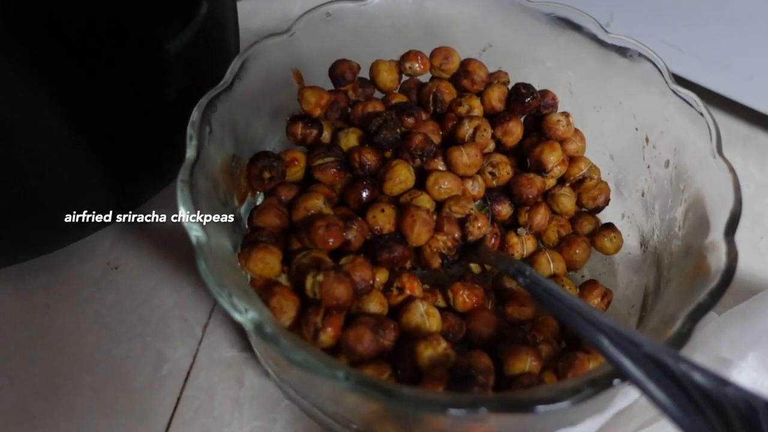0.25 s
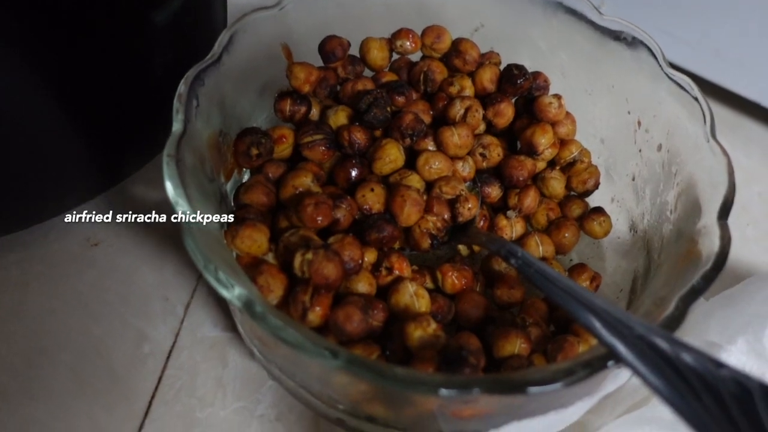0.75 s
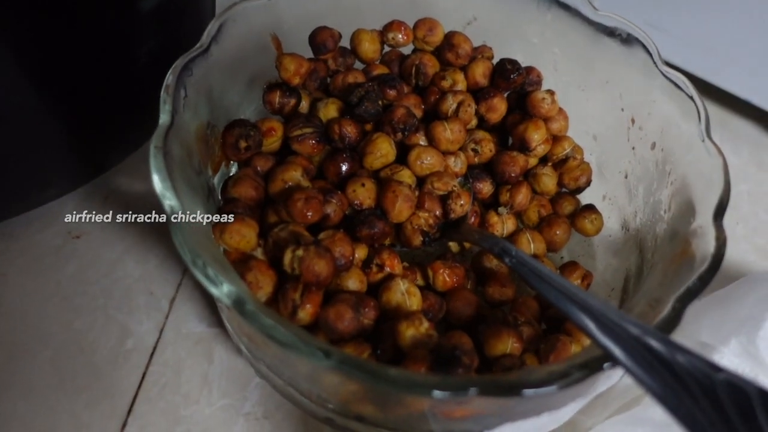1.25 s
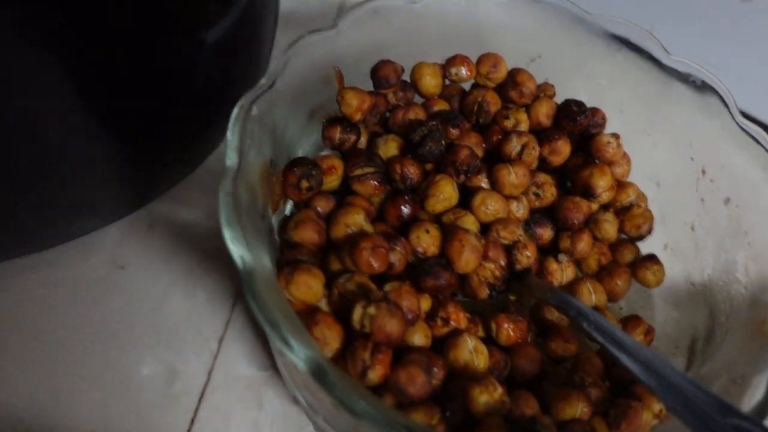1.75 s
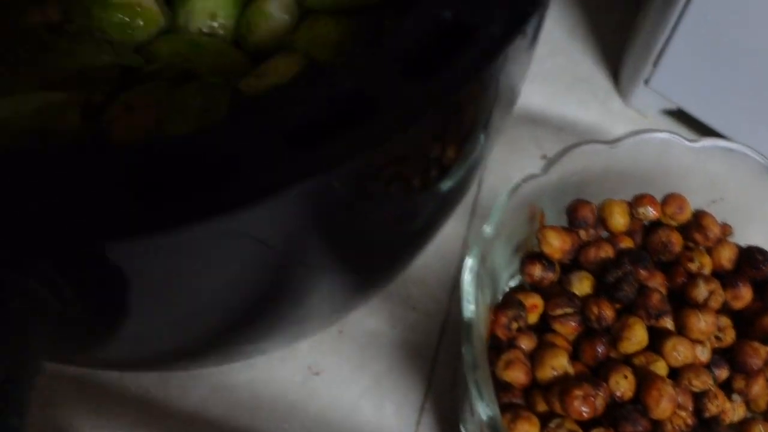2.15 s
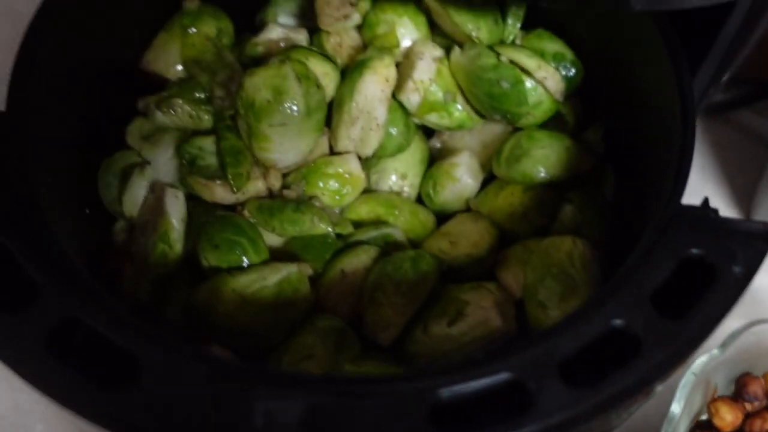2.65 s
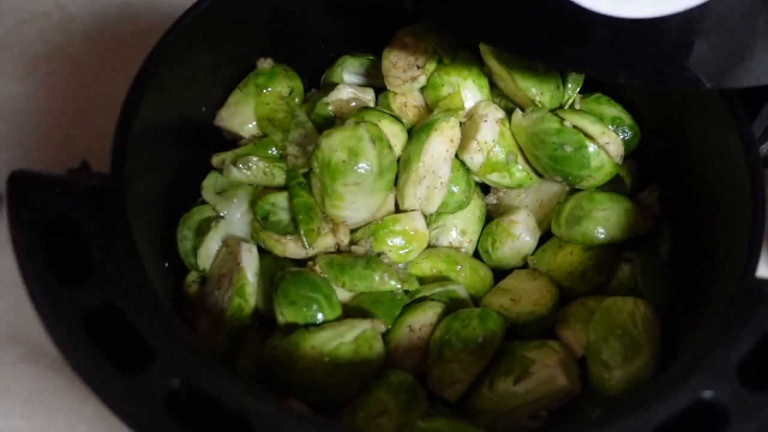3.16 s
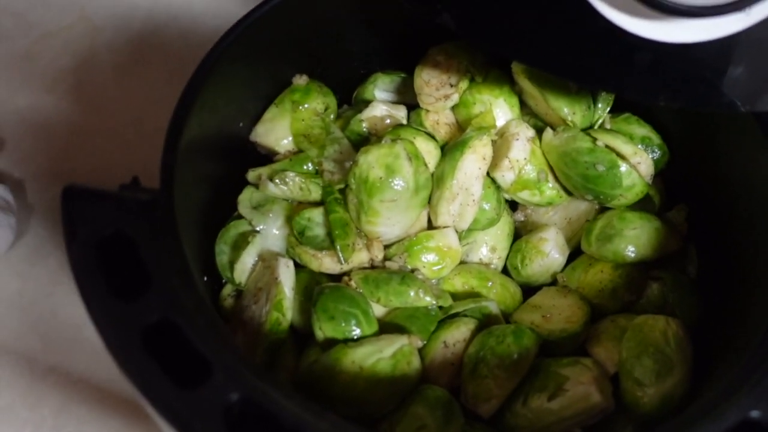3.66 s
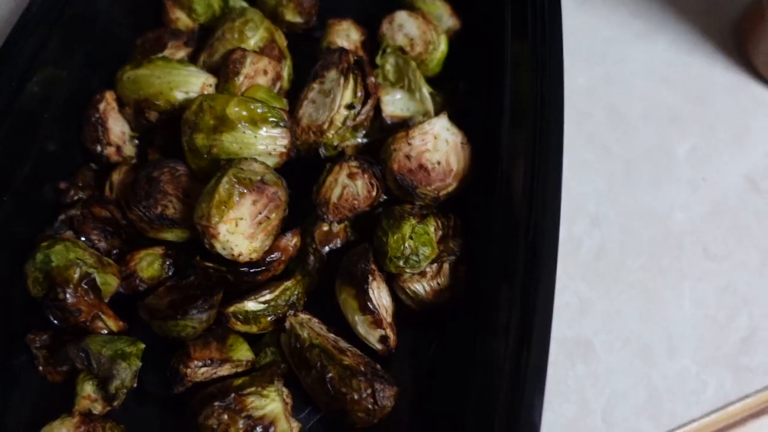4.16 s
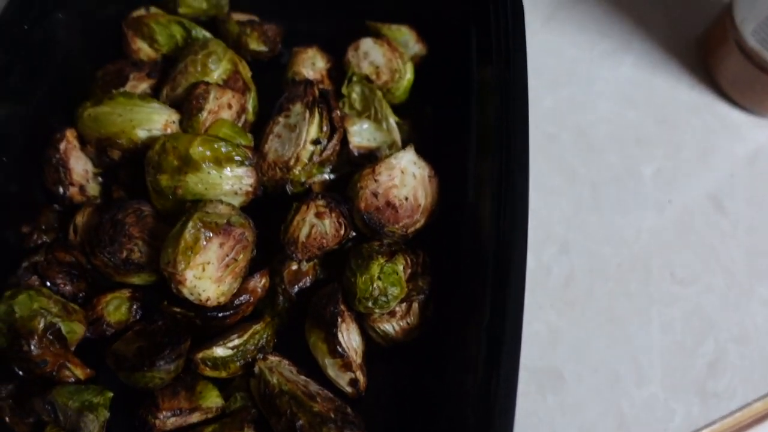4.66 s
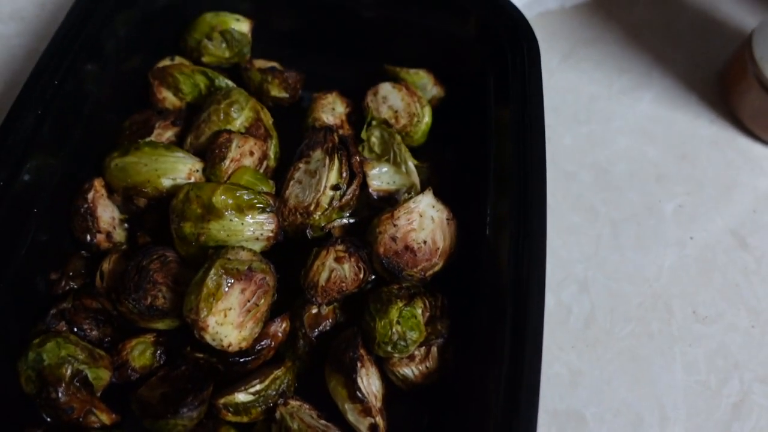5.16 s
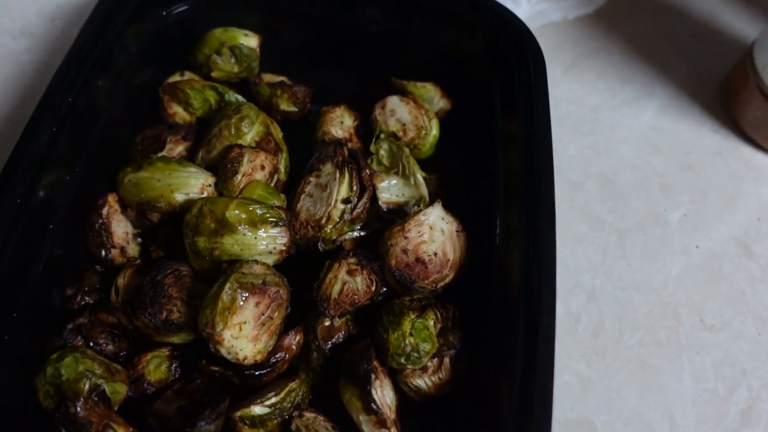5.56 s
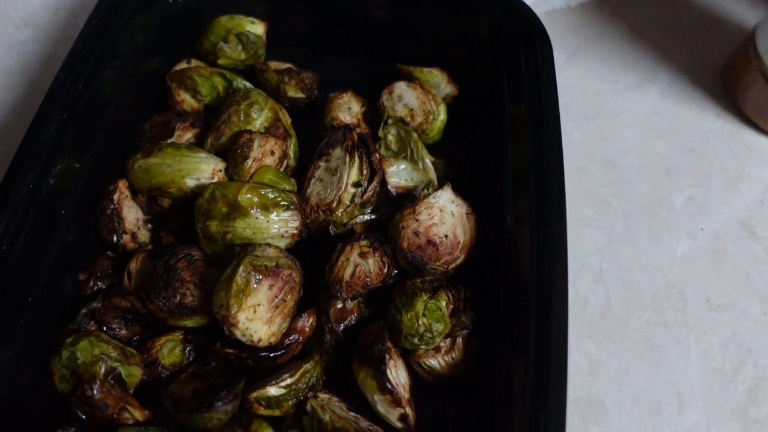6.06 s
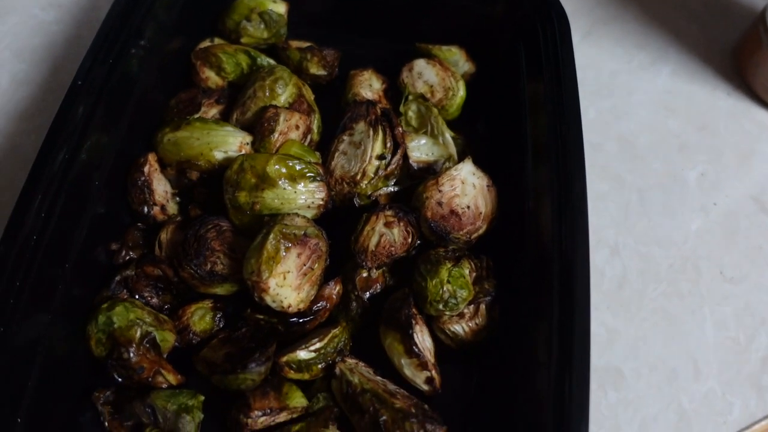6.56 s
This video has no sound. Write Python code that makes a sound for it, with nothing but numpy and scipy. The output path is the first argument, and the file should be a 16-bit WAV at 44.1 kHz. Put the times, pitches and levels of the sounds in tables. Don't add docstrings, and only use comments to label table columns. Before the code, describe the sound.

A clockwork kitchen timer ticks evenly over thin sizzle and faint hum, then a plastic tray knocks twice, rattles and creaks in quieter room air.

```python
import sys
import numpy as np
from scipy import signal
from scipy.fft import rfft, irfft, next_fast_len
from scipy.io import wavfile
from scipy.ndimage import uniform_filter1d

SR = 44100
rng = np.random.default_rng(int(sys.argv[2]) if len(sys.argv) > 2 else 0)


def bounce(signal):
    frames = np.transpose(np.atleast_2d(signal))
    limited = np.clip(frames, -1, 1)
    pcm = np.round(limited * 32767).astype(np.int16)
    wavfile.write(sys.argv[1], SR, pcm)


def makeup_ratio(level_db):
    decades = np.asarray(level_db, float) / 20
    return 10 ** decades


N = 300753
SIDES = np.array([[1], [-1]])
TOP_HZ = 15850


def in_time(rows):
    s, *columns = np.transpose(rows)
    return [np.interp(np.arange(N) / SR, s, c) for c in columns]


def at_hz(points, hz):
    point_hz, value = np.transpose(points)
    return np.interp(np.log(hz), np.log(point_hz), value)


def drift(rate_hz):
    r = np.exp(-2 * np.pi * rate_hz * 40 / SR)
    slow = signal.lfilter([1], [1, -2 * r, r * r], rng.standard_normal(N // 40 + 2002))[2000:]
    return np.interp(np.arange(N) / 40, np.arange(len(slow)), slow / slow.std())


def band(x, low_hz, high_hz):
    return signal.sosfilt(signal.butter(3, [low_hz, high_hz], "band", fs=SR, output="sos"), x)


# (frequency [Hz], likeness [0-1])
LIKENESS = [(60, 0.59), (110, 0.62), (200, 0.89), (380, 0.83), (700, 0.43), (1290, 0.67), (2380, 0.75),
            (4400, 0.71), (8120, 0.83), (15000, 0.9)]


def coloured(spectrum, peaks, pan):
    size = next_fast_len(N)
    hz = np.maximum(np.arange(size // 2 + 1) * SR / size, 1)
    gain = makeup_ratio(at_hz(spectrum, hz)) * (hz < TOP_HZ)
    for centre_hz, width_hz, lift_db in peaks:
        resonance = 1 / (1 + (2 * (hz - centre_hz) / width_hz) ** 2)
        gain = gain * (1 + (makeup_ratio(lift_db) - 1) * resonance)
    alike = np.clip(at_hz(LIKENESS, hz), 0, 1)
    mid, side = rfft(rng.standard_normal((2, size)))
    pair = np.sqrt(1 + alike) * mid + SIDES * np.sqrt(1 - alike) * side
    pair = pair * makeup_ratio(SIDES * at_hz(pan, hz) / 2)
    out = irfft(gain * pair, size)[:, :N]
    return out / out.mean(axis=0).std()


def streaky(x, depth_db, width_hz, hold_s):
    hz, t, cells = signal.stft(x, SR, nperseg=1024)
    field = rng.standard_normal(cells.shape[1:])
    for _ in range(2):
        field = uniform_filter1d(field, max(1, round(width_hz / hz[1])), axis=0)
        field = uniform_filter1d(field, max(1, round(hold_s / t[1])), axis=1)
    gain = makeup_ratio(depth_db * field / field.std())
    gain = gain / np.sqrt(np.mean(gain ** 2))
    return signal.istft(cells * gain, SR, nperseg=1024)[1][:, :N]


def strike(hits, modes, click, chatter_s, spread_db, pivot_hz, tilt, rise_cycles, softening, low_hz, high_hz,
           detune):
    out, size = np.zeros((2, N)), 4096
    t = np.arange(size) / SR
    hz, mode_db, t60, side_db, lead = np.transpose(modes)[:, :, None]
    swell = makeup_ratio(-60 * t / t60) * (1 - np.exp(-(t + 1 / SR) * hz / rise_cycles))
    for s, level_db, bright_db, pan_db in hits:
        turns = 2 * np.pi * hz * t * (1 + detune * rng.standard_normal(hz.shape))
        rings = np.array([makeup_ratio(k * side_db / 2) * swell * np.sin(turns + k * lead / 2) for k in (1, -1)])
        grains = rng.standard_normal(size // 4) * rng.random(size // 4) ** 3
        chatter = grains * np.exp(-t[:size // 4] / chatter_s)
        chatter[0] = click
        db = mode_db + tilt * bright_db * np.log2(hz / pivot_hz)
        db = db + spread_db * rng.standard_normal(hz.shape)
        force = rfft(chatter, 2 * size)
        force = force / np.sqrt(uniform_filter1d(np.abs(force) ** 2, size=60))
        sound = irfft(rfft(makeup_ratio(db[:, 0]) @ rings, 2 * size) * force)[:, :size]
        top_hz = np.clip(high_hz * makeup_ratio(softening * bright_db), 3 * low_hz, .45 * SR)
        sound = signal.sosfilt(signal.butter(2, [low_hz, top_hz], "band", fs=SR, output="sos"), sound)
        sound = signal.sosfilt(signal.butter(2, 0.7 * low_hz, "high", fs=SR, output="sos"), sound)
        first = sound[:, :size // 24].mean(axis=0)
        i = round(s * SR)
        out[:, i:i + size] += (makeup_ratio(level_db + SIDES * pan_db / 2) * sound / first.std())[:, :N - i]
    return out


def bursts(rows, octaves, alike):
    out, t = np.zeros((2, N + 16384)), np.arange(16384) / SR
    for s, db, decay_s, hz, pan_db in rows:
        mid, side = rng.standard_normal((2, len(t))) * np.exp(-t / decay_s)
        burst = np.sqrt(1 + alike) * mid + SIDES * np.sqrt(1 - alike) * side
        low_hz = hz * 2 ** (-octaves / 2)
        high_hz = min(hz * 2 ** (octaves / 2), TOP_HZ)
        sound = band(burst + 1e-18, low_hz, high_hz)
        usual = (1 + alike) * decay_s * (high_hz - low_hz)
        sound = sound * np.sqrt(usual / np.sum(sound.mean(axis=0) ** 2))
        out[:, round(s * SR):][:, :len(t)] += makeup_ratio(db + SIDES * pan_db / 2) * sound
    return out[:, :N]


# (frequency [Hz], density [dB per Hz])
NEAR_COLOUR = [(24, -78), (40, -52), (95, -34.5), (180, -11), (290, -9.5), (400, -9), (663, -8.5),
               (1070, -4.5), (2050, -7.5), (2630, -7.5), (3300, -12), (7000, -15.5), (12000, -23.5),
               (16000, -26.5)]
# (frequency [Hz], width [Hz], lift [dB])
NEAR_PEAKS = [(512, 125, 6), (1100, 210, 7.5), (1496, 350, 6.5), (2583, 85, 12.5), (5300, 240, 4)]
# (frequency [Hz], left-right [dB])
NEAR_PAN = [(60, -0.5), (150, 2.5), (380, -4.5), (950, 1.5), (2380, 0.39), (5980, 1), (15000, 5)]


def near_air():
    t = np.arange(N) / SR
    level_db = -58.92 - 0.33 * t + 0.15 * drift(8.4)
    air = coloured(NEAR_COLOUR, NEAR_PEAKS, NEAR_PAN)
    return makeup_ratio(level_db) * streaky(air, depth_db=1.15, width_hz=90, hold_s=.1)


# (frequency [Hz], density [dB per Hz])
SIZZLE_COLOUR = [(5000, -35), (7000, -23), (8600, -5.5), (9750, 7), (10500, 2.5), (11400, -25),
                 (12500, -41)]
# (frequency [Hz], density [dB per Hz])
SIZZLE_EDGE = [(7600, -18), (8500, 1), (9600, -10), (10800, 2), (11900, -1), (12500, -28), (14000, -38.5)]
# (frequency [Hz], width [Hz], lift [dB])
SIZZLE_PEAKS = [(8800, 130, 2.5), (9700, 160, 0), (9700, 150, 3), (10850, 130, 3.5), (11600, 200, 4)]


def sizzle():
    t = np.arange(N) / SR
    period_s, top_s, dip_sharpness = 1.05, 0.4, 4.1
    cycle = np.cos(2 * np.pi * (t - top_s) / period_s)
    swell = -np.exp(dip_sharpness * (cycle - 1)) + 0.071 * drift(1.8)
    core = streaky(coloured(SIZZLE_COLOUR, SIZZLE_PEAKS, NEAR_PAN), depth_db=1.3, width_hz=200, hold_s=0.3)
    edge = streaky(coloured(SIZZLE_EDGE, SIZZLE_PEAKS, NEAR_PAN), depth_db=-4.0, width_hz=100, hold_s=0.86)
    return makeup_ratio(-63.5 + 5 * swell) * core + makeup_ratio(-74 + 4.5 * swell + t) * edge


# (time [s], level [dB])
HUM = [
    [(0.0, -78), (1.76, -76), (2.86, -85), (3.0, -76.5), (4.04, -82), (4.14, -101)],
    [(4.5, -64), (4.74, -59), (5.2, -62.5), (5.62, -64), (6.04, -63), (6.78, -65.5), (6.82, -73)],
]


def hum(rows, pan_db, waver_db):
    phase = 2 * np.pi * np.cumsum(348.2 + 1.25 * drift(5.85)) / SR
    level_db = in_time(rows)[0] + waver_db * drift(7.1) + SIDES * pan_db / 2
    return np.sqrt(2) * makeup_ratio(level_db) * (np.sin(phase) + makeup_ratio(-24) * np.sin(phase / 2))


# (time [s], level [dB], decay [s], centre [Hz], left-right [dB])
BUMPS = [
    (.12, -47, 0.081, 506, -4),
    (.33, -53.5, 0.88, 627, -15),
    (.6, -53, 0.17, 635, -18),
    (.7565, -43, 0.012, 6860, -1),
    (1.949, -43, 0.081, 492, -6),
    (2.66, -40.5, 0.016, 514, -14),
    (2.99, -31, 0.0059, 410, -5.5),
    (3.725, -36, 0.013, 636, -11),
]


def bumps():
    return bursts(BUMPS, octaves=0.24, alike=1.0)


# (frequency [Hz], level [dB], t60 [s], extra on tocks [dB],
# extra once the microphone faces the timer [dB])
TIMER_MODES = [(1154, -12, 0.19, -5.5, -2.5), (1640, -7.5, 0.0087, 7, -14), (2250, -14.5, 0.0063, 18.5, -4),
               (2652, -1, 0.029, 0.5, 2), (2816, -1, 0.023, 0.5, -0.5), (3540, -11, 0.024, 1, 3),
               (4240, -11, 0.056, 8, -3.5), (4563, -1.5, 0.017, -0.5, 2.5), (4866, -5.5, 0.015, 1.5, 7.5),
               (5210, -8, 0.026, -1, 9.5), (6250, -1.5, 0.009, 3, -3.5), (6580, -7, 0.02, 1, -1.5),
               (7260, -0.5, 0.0041, 3, -3.5), (7990, 4.5, 0.0047, -2, 2), (8580, -1, 0.0031, 4.5, 4.5),
               (9700, -4.5, 0.0048, -12, 6), (9230, 9.5, 0.0038, -3, -9), (10300, -14, 0.004, -11, 7),
               (10900, -27, 0.0068, -2, 14)]
# (time [s], level [dB], brightness [dB], level of the unlocking before it [dB])
BEATS = [(0.259, -40.5, 4, -70), (0.537, -39.5, -4, -65), (0.8156, -38.5, 8, -51), (1.0972, -42, -2, -54),
         (1.3773, -43, 0, -52), (1.6607, -41.5, -4, -56), (1.941, -39.5, 3, -49.5),
         (2.2246, -39.5, 17, -52), (2.5057, -39, 8, -48), (2.79, -39.5, 10, -50),
         (3.0709, -37.5, 16, -47.5), (3.3587, -40.5, 1.5, -49.5), (3.6386, -41.5, 0, -49),
         (3.9259, -40.5, -1, -51.5)]
# (lead [s], brightness [dB])
UNLOCK = [
    (0.0335, -0.5),
    (0.0138, -3),
]
# (delay [s], loss [dB])
BOUNCES = [(.0031, -6.5), (.0045, -8.5), (0.0022, -5), (0.0051, -6), (.003, -4), (.003, -14), (0.0036, -3),
           (0.0042, -9.5), (0.0043, -6.5), (0.0042, -3.5), (0.006, -7), (0.0059, -12), (0.0046, -9),
           (0.0024, -4)]
# (time [s], level [dB], brightness [dB])
PLAY = [(0.2435, -50.5, 0), (0.896, -57, 23), (2.1972, -59, 13), (2.312, -58.5, 5), (2.53, -55, 8),
        (2.759, -60, 9), (3.1596, -59, -21), (3.327, -58, 4), (3.6638, -53, -21), (3.7278, -58, -27),
        (2.593, -58.5, 3), (.158, -59, -6), (.337, -61, 12), (.715, -65, 8), (1.265, -61, 14),
        (1.775, -63, 10), (1.839, -65, 5), (1.97, -58, 12), (2.2018, -62, 12)]
# (time [s], left-right [dB])
TURN = [(1.9, 3), (2.3, 1.8)]


def timer():
    facing_s = 2.1
    hits = []
    for k, ((s, db, bright, unlock_db), (lag_s, loss_db)) in enumerate(zip(BEATS, BOUNCES)):
        tock = k % 2
        lead_s, unlock_bright = UNLOCK[tock]
        hits.append((s - lead_s, unlock_db, unlock_bright, tock))
        hits.append((s, db, bright, tock))
        hits.append((s + lag_s, db + loss_db, bright, tock))
        if tock:
            hits.append((s + 0.0138, db - 11, bright - 13, tock))
    hits += [(s, db, bright, 0) for s, db, bright in PLAY]
    out, leads = 0, rng.normal(0, 0.061, len(TIMER_MODES))
    for tock, facing in [(0, 0), (0, 1), (1, 0), (1, 1)]:
        modes = [(hz, db + tock * tock_db + facing * facing_db, t60, 0, lead)
                 for (hz, db, t60, tock_db, facing_db), lead in zip(TIMER_MODES, leads)]
        group = [(s, db, bright, np.interp(s, *np.transpose(TURN)))
                 for s, db, bright, kind in hits if kind == tock and (s > facing_s) == facing]
        out = out + strike(group, modes, click=1.1, chatter_s=0.0016, spread_db=3.0, pivot_hz=5500, tilt=0.32,
                           rise_cycles=0.48, softening=0.059, low_hz=920, high_hz=12000, detune=.007)
    return out


# (time [s], level [dB], decay [s], centre [Hz], left-right [dB])
CRACKS = [
    (.7557, -48.5, .008, 11600, 3),
    (.7557, -50, 0.016, 4600, 0),
    (4.167, -70, 0.058, 12000, 7),
    (4.3125, -42.5, 0.0033, 10900, 3),
    (4.3965, -35, 0.003, 7100, 3),
    (5.2215, -39.5, 0.002, 2600, -6),
    (5.705, -51, .002, 3940, -4),
]


def cracks():
    return bursts(CRACKS, octaves=0.92, alike=0.93)


# (time [s], peak level [dB], t60 [s], frequency [Hz], left-right [dB])
POPS = [(3.9321, -25.5, 0.0014, 4700, 11), (3.9326, -16.5, 0.0012, 5000, -15.5),
        (3.9338, -20.5, 0.0037, 2700, -7), (3.9344, -28, 0.0096, 910, -4), (3.9349, -40, 0.016, 477, -7),
        (4.2536, -35, .004, 3400, -5), (4.259, -31, .004, 2800, 3), (4.2796, -41, .003, 4200, 0),
        (4.2862, -24, 0.0023, 2800, -7), (4.3125, -13.5, 0.056, 447, -7), (4.3968, -13.5, 0.031, 418, -6),
        (4.3972, -21, .02, 720, -7), (4.323, -34, .03, 660, 5), (4.404, -39, .03, 310, -8),
        (2.2118, -32, 0.0092, 7400, -1), (5.9872, -38, 0.0077, 1330, 3), (4.3126, -6.5, 0.001, 2300, -5),
        (4.3964, -8, 0.0012, 2430, -9), (6.59, -36, 0.0067, 3426, 3), (6.5898, -36, 0.0047, 2300, 9),
        (6.5922, -38, 0.0085, 1840, -7)]
# (frequency [Hz], left lead [rad])
POP_LEAD = [(450, 0.68), (600, 4.2), (1000, .8), (2400, .7), (5000, .2)]


def pops():
    out, t = np.zeros((2, N + 2048)), np.arange(2048) / SR
    for s, db, t60, hz, pan_db in POPS:
        swing = np.sin(2 * np.pi * hz * t + SIDES * at_hz(POP_LEAD, hz) / 2)
        out[:, round(s * SR):][:, :len(t)] += makeup_ratio(db + SIDES * pan_db / 2 - 60 * t / t60) * swing
    return band(out[:, :N] + 1e-18, 380, 6700)


# (time [s], level [dB], brightness [dB], left-right [dB])
KNOCKS = [(3.0223, -50, -5, 1), (3.03, -53, -15, -1), (4.1823, -38.5, -3.5, -1), (4.198, -56, 6, -2),
          (4.2328, -48, -1, 1), (4.255, -44, -8, -3), (4.259, -42, -14, 5), (4.2875, -42, -14, -3),
          (4.29, -44, -3, -8), (4.298, -50, 4, 0), (4.3015, -39.5, 2, -6), (4.3131, -33, -2, 1),
          (4.3138, -20.5, -6, 1), (4.3249, -39, -7, -3), (4.3323, -45, 15, -4), (4.346, -48, 13, 4),
          (4.365, -50, 6, 15), (4.3964, -52, 3, -2), (4.3969, -29.5, 4, 8), (4.3976, -17.5, -7.5, -1.5),
          (4.406, -41, 8, 12), (4.4085, -39.5, -8, 7), (4.4181, -40, -12, -1), (4.445, -50, -4, 2),
          (4.45, -51, 1, 6), (4.454, -57, 1, 0), (4.559, -50, -8, -1), (4.582, -51.5, -4, 0)]
# (frequency [Hz], level [dB], t60 [s], left-right [dB], left lead [rad])
TRAY_MODES = [(313, -29.5, 0.11, -21, 7), (437.5, -5.5, 0.023, -3.5, 0.44), (565, -3, 0.025, 1.5, 4),
              (648, -16, 0.062, 2, 7.5), (900, -21, 0.085, 12, -1.5), (1060, 0, 0.032, 6.5, 1.5),
              (1420, 2, 0.014, 7, 0.5), (1600, 2.5, 0.01, 12, 1.7), (1835, 0, 0.011, 1, 1),
              (2310, -20, 0.0063, -3, -3), (2380, -8.5, 0.01, 14, 3), (2700, -3, 0.0087, -6, 0.8),
              (2940, -6.5, 0.0061, -20.5, 3.5), (3280, -2, 0.0065, -11, 0), (3590, -13, 0.017, 9, 0.2),
              (4540, -18, 0.0065, -15, 3.5), (5300, -27, 0.0081, 28, -2), (5900, -19, 0.0047, -7, 3),
              (7500, -38, .004, -19, -12)]


def tray_knocks():
    knocks = [(s, db, bright + 4, pan) for s, db, bright, pan in KNOCKS]
    return makeup_ratio(-0.5) * strike(knocks, TRAY_MODES, click=25.0, chatter_s=.0015, spread_db=1.2, pivot_hz=1500,
                              tilt=0.71, rise_cycles=0.7, softening=0.92, low_hz=255, high_hz=8500,
                              detune=.006)


# (time [s], level [dB], decay [s], centre [Hz], left-right [dB])
CLICKS = [
    (3.895, -54, 0.0045, 4300, -2),
    (3.9322, -37, 0.0015, 5500, 3),
    (4.367, -42, 0.0015, 5500, 4),
    (4.3987, -28, 0.0059, 240, 0),
    (6.5891, -38.5, 0.00073, 9000, 9),
]


def clicks():
    return bursts(CLICKS, octaves=2.1, alike=0.64)


# (frequency [Hz], density [dB per Hz])
FAR_COLOUR = [(24, -79), (40, -45), (140, -31.5), (163, -26), (305, -11), (345, -4), (382, -12),
              (663, -16.5), (990, -13), (1150, -13.5), (1300, -12.5), (1680, -18.5), (2630, -18),
              (2980, -22), (16000, -40.5)]
# (frequency [Hz], width [Hz], lift [dB])
FAR_PEAKS = [(444, 25, 4.6), (1034, 88, 4.2), (1600, 270, 5.2), (2270, 73, 4), (2567, 45, 10.3),
             (2640, 60, 7.7), (5800, 370, 3.2)]
# (frequency [Hz], left-right [dB])
FAR_PAN = [(60, -4), (150, 1.5), (380, -2), (950, 1), (2380, -1), (5980, 0.5), (15000, -0.5)]


def far_air():
    air = coloured(FAR_COLOUR, FAR_PEAKS, FAR_PAN)
    return makeup_ratio(-59.5 + 0.18 * drift(8.8)) * streaky(air, depth_db=2.0, width_hz=90, hold_s=.1)


# (time [s], pitch [Hz], level [dB])
GROAN = [
    [(4.162, 400, -59), (4.172, 410.5, -46.5), (4.228, 433, -58), (4.238, 423, -43), (4.252, 411, -53),
     (4.27, 407, -35.5), (4.285, 427, -44), (4.305, 440, -40), (4.315, 440, -88)],
    [(4.36, 440, -82), (4.37, 440, -61), (4.394, 417, -58), (4.4, 424, -70), (4.44, 422, -60),
     (4.452, 414, -42), (4.462, 417, -58), (4.474, 427, -47), (4.53, 420, -86)],
]


def groan():
    out = 0
    for rows in GROAN:
        hz, db = in_time(rows)
        phase = 2 * np.pi * np.cumsum(hz + 8.14 * drift(41.3)) / SR
        level_db = db + 1.9 * drift(50) + SIDES * -2.1
        out = out + np.sqrt(2) * makeup_ratio(level_db) * np.sin(phase + SIDES * 0.42)
    return out


# (time [s], body level [dB], grit level [dB])
RUB = [(4.165, -61, -72), (4.185, -49, -51), (4.22, -49, -54), (4.245, -49, -58), (4.27, -47.5, -55),
       (4.3, -49, -50.5), (4.34, -43, -51), (4.362, -52, -55), (4.38, -47, -53), (4.395, -37, -46),
       (4.43, -54.5, -52.5), (4.47, -53, -53.5), (4.52, -56.5, -58.5), (4.65, -61.5, -65.5),
       (4.71, -50, -58.5), (4.8, -58, -63), (4.98, -57.5, -68.5), (5.1, -77, -76)]
# (frequency [Hz], density [dB per Hz])
GRIT_COLOUR = [(300, -15), (900, 2), (1500, 0), (2600, -4.5), (4000, -10), (8000, -21.5), (15000, -30)]


def rub():
    lumps = rng.standard_normal(N) * makeup_ratio(6.1 * drift(32))
    body = np.zeros((2, N))
    for hz, db, t60, side_db, lead in TRAY_MODES:
        pole = makeup_ratio(-60 / (1.3 * t60 * SR)) * np.exp(2j * np.pi * hz / SR)
        ring = signal.lfilter([1], [1, -pole], lumps) * makeup_ratio(db - 23 * np.abs(np.log2(hz / 430)))
        body += np.imag(ring * np.exp(SIDES * 1j * lead / 2)) * makeup_ratio(SIDES * side_db / 2)
    body = band(body, 336, 6600)
    body_db, grit_db = in_time(RUB)
    grit_level = makeup_ratio(grit_db + 3.2 * drift(40) + 1.4 * drift(270))
    grit = grit_level * coloured(GRIT_COLOUR, FAR_PEAKS, FAR_PAN)
    return makeup_ratio(body_db) * body / body.mean(axis=0).std() + grit


# (time [s], level [dB], brightness [dB])
SLIPS = [(4.668, -55.5, 16), (4.683, -49, -17), (4.694, -41.5, -6), (4.7071, -38, -5), (4.716, -38, 6),
         (4.723, -38, 5.5), (4.7287, -43, 9), (4.7342, -38, -2), (4.7404, -39.5, -7), (4.7674, -44.5, -12),
         (4.7614, -51, -15), (4.773, -47, 6), (4.747, -52, -19), (4.782, -49.5, -9), (5.2741, -49.5, 8),
         (5.9862, -44.5, 4)]
# (frequency [Hz], level [dB], t60 [s], left-right [dB], left lead [rad])
RIM_MODES = [(337, -21, 0.056, -3, -11.5), (419.6, -1, 0.11, -1, 0.65), (524, 1.5, 0.017, 1, 0.3),
             (660, -1, 0.019, 0, 0), (870, -12, 0.03, -7, -1), (1044, 0.5, 0.023, 15, 3.5),
             (1470, -1.5, 0.013, -7, 2.1), (1580, -3.5, 0.01, -2, -0.5), (1900, -21, 0.0095, 9, -8.5),
             (2300, -9.5, 0.015, 13, 1.5), (2700, -11, 0.0087, -8, 2.2), (3120, -14, 0.0096, 1, 0),
             (3390, -14.5, 0.011, -11, 0), (5000, -23, 0.0052, -17, 14.5), (6500, -35, .004, -12, -6)]


def rim_creak():
    slips = [(s, db, bright, -0.5) for s, db, bright in SLIPS]
    return makeup_ratio(3.0) * strike(slips, RIM_MODES, click=30.0, chatter_s=0.001, spread_db=1.5, pivot_hz=1400,
                             tilt=0.31, rise_cycles=0.33, softening=0.41, low_hz=282, high_hz=5000, detune=.01)


# (time [s], level [dB], half length [s])
RUMBLE = [
    (4.84, -71, 0.18),
    (5.972, -97, 0.18),
    (6.68, -69, 0.12),
]
# (frequency [Hz], density [dB per Hz])
RUMBLE_COLOUR = [(90, -32), (150, -23), (200, -1), (270, -7), (400, -35)]


def rumble():
    t = np.arange(N) / SR
    swells = sum(makeup_ratio(db) * np.exp(-np.abs(t - s) / half_s) for s, db, half_s in RUMBLE)
    return swells * makeup_ratio(1.0 * drift(16)) * coloured(RUMBLE_COLOUR, [], FAR_PAN)


def scene():
    t = np.arange(N) / SR
    change_s, gap_s = 4.155, 0.0036
    fade_out = np.clip((change_s - t) / 0.023, 0, 1)
    fade_in = np.clip((t - change_s - gap_s) / 0.022, 0, 1)
    near = near_air() + sizzle() + hum(HUM[0], pan_db=-0.72, waver_db=5.3)
    far = far_air() + groan() + rub() + hum(HUM[1], pan_db=-3.5, waver_db=0.99) + rumble()
    contacts = bumps() + timer() + cracks() + pops() + tray_knocks() + clicks() + rim_creak()
    return near * fade_out + far * fade_in + contacts


def roll_off(x):
    return signal.sosfilt(signal.butter(12, 16660, fs=SR, output="sos"), x)


# (frequency [Hz], density [dB per Hz])
BASS_NOISE = [(20, -16), (60, -4), (110, -3), (200, -11.5)]


def record(dry):
    thin = signal.sosfilt(signal.butter(2, 120, "high", fs=SR, output="sos"), dry)
    thin = signal.sosfilt(signal.cheby2(10, 60, 16700, fs=SR, output="sos"), thin)
    self_noise = makeup_ratio(-90 + 3.6 * drift(6.7)) * coloured(BASS_NOISE, [], FAR_PAN)
    return roll_off(thin + self_noise)


dry = scene()
out = record(dry)
bounce(out)
```